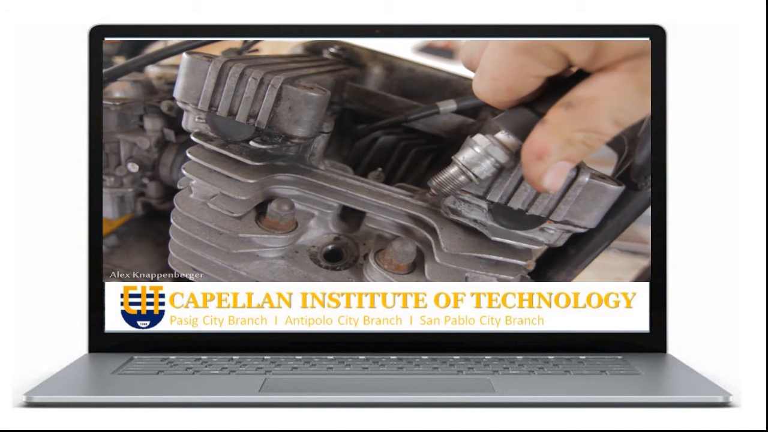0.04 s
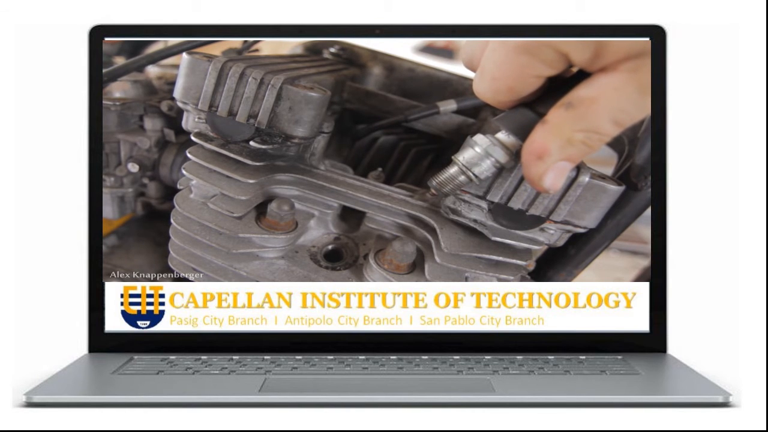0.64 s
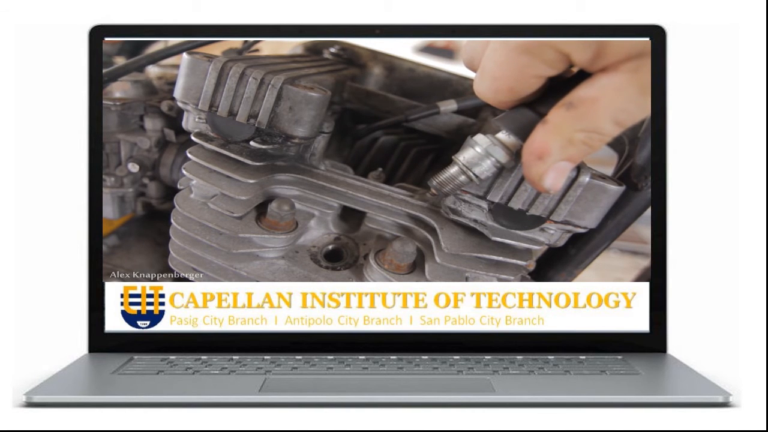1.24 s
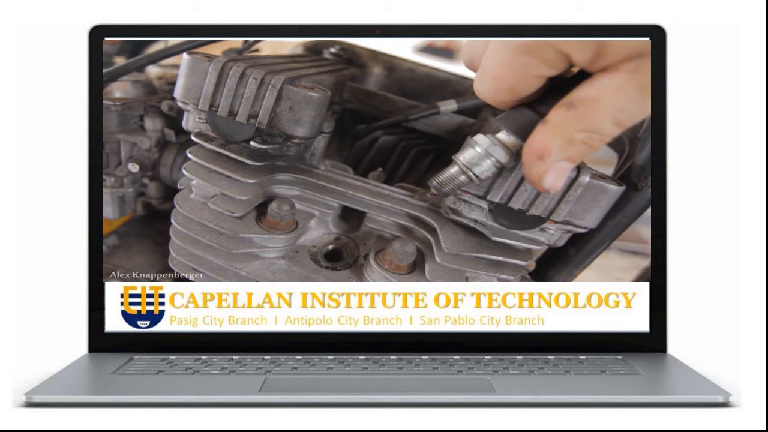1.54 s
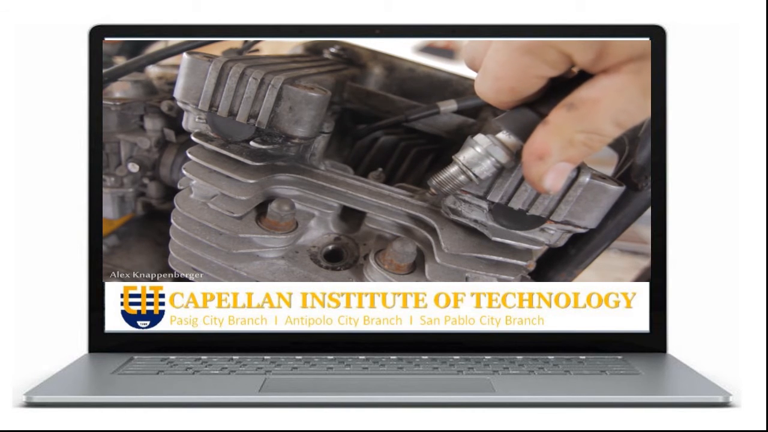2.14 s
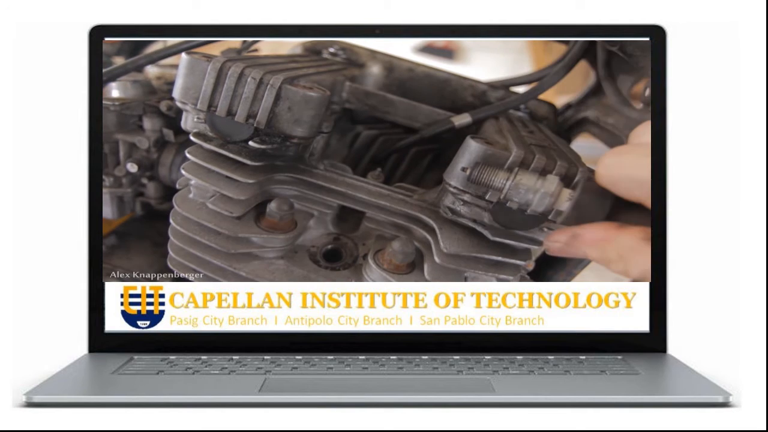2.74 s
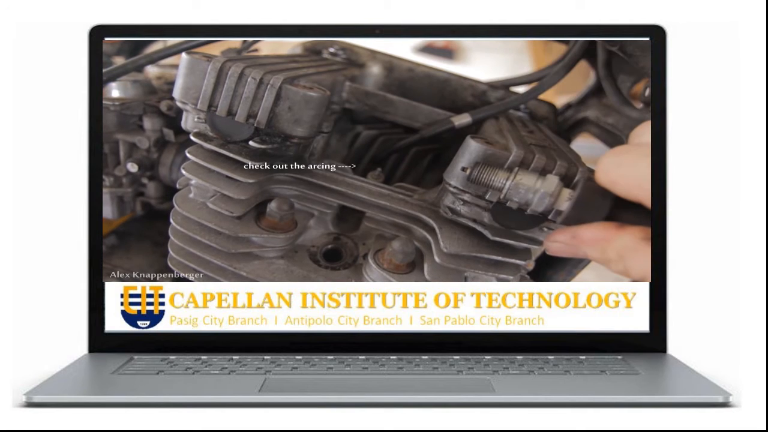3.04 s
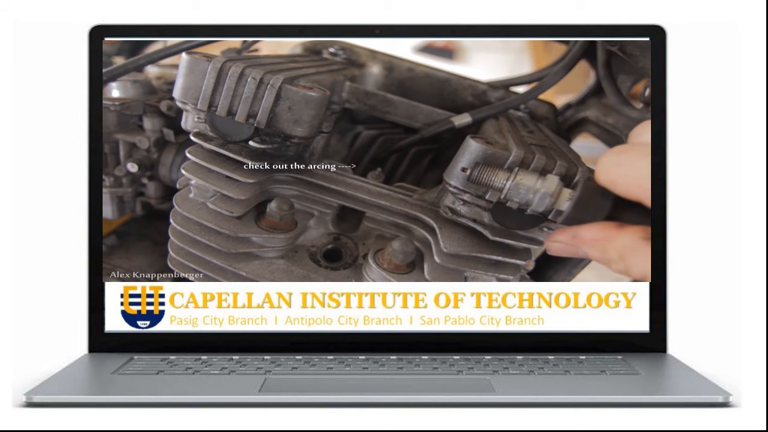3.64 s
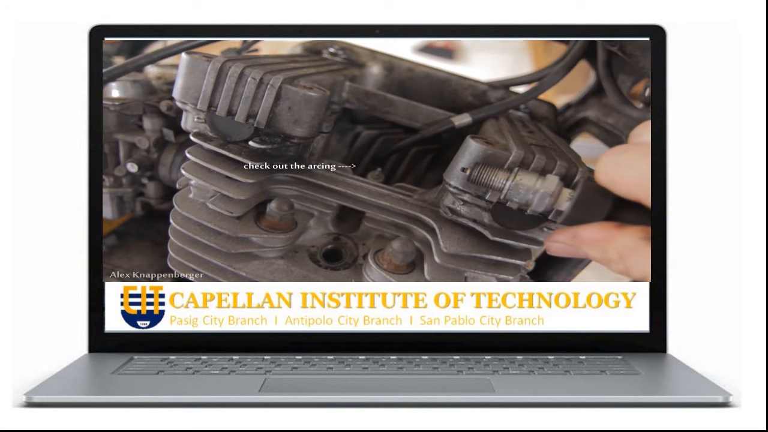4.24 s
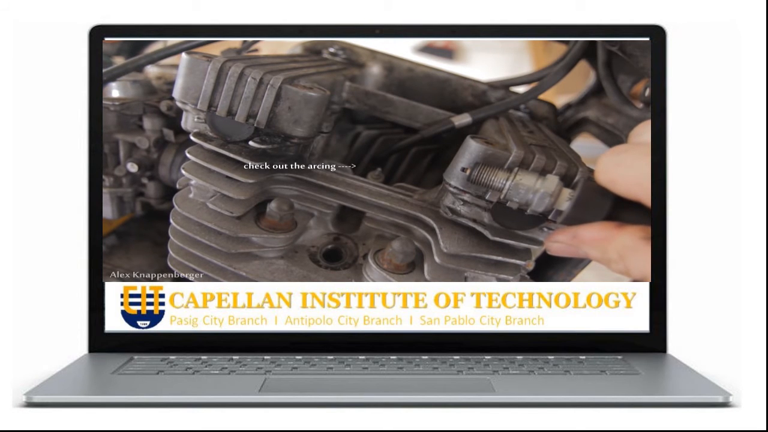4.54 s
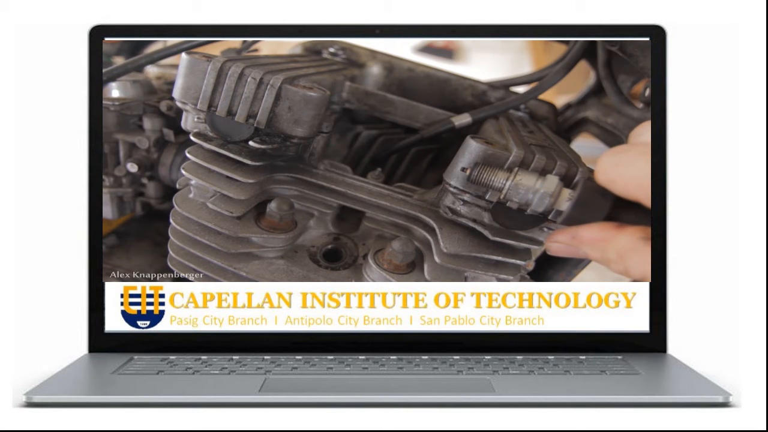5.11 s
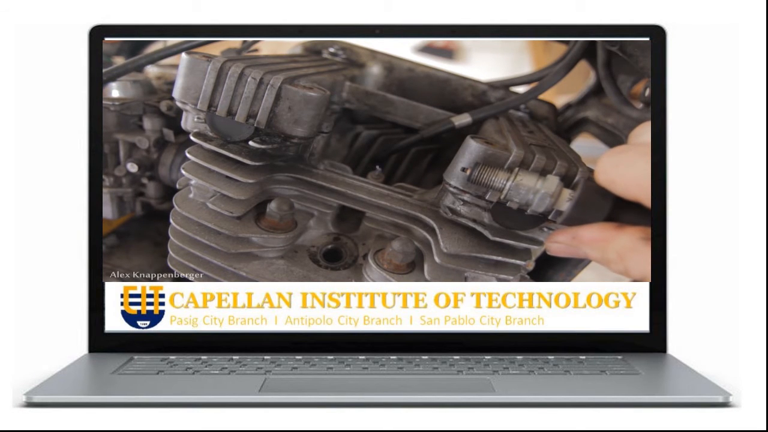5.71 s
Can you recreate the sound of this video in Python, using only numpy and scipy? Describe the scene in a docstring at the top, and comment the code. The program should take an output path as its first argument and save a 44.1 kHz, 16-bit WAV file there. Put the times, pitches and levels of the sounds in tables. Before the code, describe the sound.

A motorcycle engine turns over in two rattling, whining tries on its starter, never catching, with a short pause between them.

```python
"""Over the low hum of a workshop, an electric starter turns a motorcycle engine with one spark plug out.
Nothing fires. Each cycle loads the starter four times: three short strokes ending in a puff, then a long
one. Under each the drive rattles and the motor slows, so its whine sags and its brush hiss dips.
At 2.3 s the starter is released and runs down with a clunk; in the pause a hand shifts the plug lead.
At 3.2 s the starter engages with a crack and turns the engine again."""
import sys
import numpy as np
from scipy import signal
from scipy.fft import rfft, irfft
from scipy.io import wavfile

SR = 44100
rng = np.random.default_rng(int(sys.argv[2]) if len(sys.argv) > 2 else 0)


def put_to_file(sound):
    """Save the sound as 16-bit audio at rate SR, in the file named by the first command-line argument."""
    columns = np.atleast_2d(sound).T  # one column per channel
    safe = np.clip(columns, -1, 1)
    whole_steps = np.round(safe * 32767)
    wavfile.write(sys.argv[1], SR, whole_steps.astype(np.int16))


N = 258867
T = np.arange(N) / SR
STOP_S, RESTART_S = 2.315, 3.24  # starter button released, pressed again
FREE_MESH_HZ, LAG_S = 722, .024  # unloaded gear mesh; delay from a stroke's end to the lowest speed

# steady partials of the hum: pitch_hz, rms_db
HUM_PARTIALS = [(91.5, -47), (127, -55), (177.6, -55), (285.3, -60), (419.9, -54.5), (506, -60),
                (656.8, -62)]
# spectrum of the workshop air: frequency_hz, gain_db
ROOM_SPECTRUM = [(10, 2.5), (30, -4.5), (55, -8), (90, -14.5), (130, -14.5), (220, -20.5), (450, -22.5),
                 (800, -23.5), (1500, -30.5), (2500, -40.5), (4200, -51), (5500, -54.5), (15000, -59)]
# engine cycles, timed by the starts of their strokes: first_s, second_s, last_s, strength_db
ENGINE_CYCLES = [(-.108, .034, .208, .5), (.388, .532, .706, 0), (.889, 1.032, 1.207, -.7),
                 (1.39, 1.535, 1.668, -.3), (1.842, 1.983, 2.157, .8), (3.252, 3.39, 3.58, -.3),
                 (3.765, 3.903, 4.082, 0), (4.264, 4.406, 4.583, 0), (4.764, 4.906, 5.076, 0),
                 (5.263, 5.402, 5.572, 0), (5.76, 5.9, 6.07, 0)]
# the four strokes of a cycle: length_s, rise_s, start_load_db, end_load_db, whine_db, slowest_mesh_hz
STROKE_SHAPES = [(.062, 0.0073, -15.5, -18.5, -33, 495), (.056, 0.0068, -14.5, -22.5, -29.5, 500),
                 (.027, 0.018, -18.5, -17, -31.5, 630), (.118, 0.011, -21.5, -17, -25.5, 485)]
# clutch snap at the start of each of the four, gear knock near its end: snap_db, knock_db
STROKE_IMPACTS = [(-19.5, -14), (-21, -14), (-24, -27), (-21.5, -15.5)]
# envelope of the unloaded gear and chain clatter: time_s, level_db
CLATTER_ENVELOPE = [(0, -28), (2.29, -28), (2.35, -27.5), (2.42, -36.5), (2.5, -36.5), (2.58, -46.5),
                    (2.75, -62), (3.236, -82), (3.241, -27), (5.87, -29)]
# spectra of the drive under load and running free: frequency_hz, gain_db
LOADED_SPECTRUM = [(60, -11.5), (200, -22.5), (450, -21.5), (750, -11.5), (1000, -5.5), (1450, -2.5),
                   (2100, -3), (2800, 0.5), (3600, -7), (4400, -14.5), (5200, -13.5), (9000, -27.5),
                   (15000, -45)]
FREE_SPECTRUM = [(30, -13), (120, -17.5), (300, -2.5), (450, -7.5), (700, -8), (1100, -1), (1600, -4),
                 (2400, -2), (4000, -6.5), (5200, -12), (9000, -13), (15000, -27)]
# resonances of the engine cases and fins: centre_hz, width_hz, lift_db
CASE_MODES = [(533, 86, 7), (802, 33, 5), (953, 103, 4.5), (1112, 76, 7.5), (1271, 8.3, 2.5),
              (1355, 165, 6.5), (1538, 85, 6.5), (1616, 66, 7), (1925, 56, 5.5), (2020, 27, 3.5),
              (2175, 30, 4), (2578, 62, 8), (2615, 160, -3), (2987, 64, 4), (3040, 70, -7), (3384, 28, 3.5),
              (3456, 54, 0.5), (4075, 100, 6.5), (4353, 174, 7), (6130, 230, 4), (6970, 260, 6),
              (8520, 270, 6), (9370, 240, 4.5), (10400, 270, 5), (11070, 110, 7)]
# harmonics of the gear mesh: multiple, level_db
MESH_HARMONICS = [(1, -10), (2, -5), (3, -16), (4, 0), (5, -6), (6, -13), (7, -14)]
# how well the gear cover radiates the whine: frequency_hz, gain_db
COVER_RESPONSE = [(450, 0), (550, -1), (610, -12), (780, -12), (950, -2), (1250, -2), (2600, 1), (6000, 0)]
# spectra of the brush hiss, the steel snaps and the exhaust air: frequency_hz, gain_db
BRUSH_SPECTRUM = [(500, -39), (2000, 0.5), (3800, 1), (5200, -5.5), (7500, -0.5), (9500, -1.5),
                  (11000, -2.5), (12500, -3.5), (15500, -4)]
SNAP_SPECTRUM = [(300, -31), (1200, -5), (4000, -4.5), (5600, 2), (7500, 0.5), (10000, -4.5), (15500, 0.5)]
RUSH_SPECTRUM = [(15, 3.5), (35, 9.5), (55, -8), (90, -5.5), (130, -1.5), (170, -8.5), (260, -9),
                 (400, -14.5), (900, -59), (4000, -71)]
# puffs of the first three strokes, timed from each stroke's start: delay_s, level_db, rush_decay_s
EXHAUST_PUFFS = [(.041, -26, .028), (0.025, -26, 0.027), (.046, -23.5, 0.031)]
# resonances of the exhaust pipes: nominal_hz, level_db, t60_s
PIPE_MODES = [(27.7, -11, 0.19), (85, -1, 0.17), (159.5, -3.5, 0.092), (257, -8.5, 0.1)]
# jerks as the starter lets go and as it gets the engine moving: start_s, length_s, load_db
DRIVE_JERKS = [(2.361, .016, -19.5), (3.35, .028, -15.5), (3.4, .04, -15)]
# clunks as slack in the drive is taken up: start_s, pitch_hz, level_db, t60_s
SLACK_CLUNKS = [(2.369, 286.5, -31, 0.074), (3.255, 360, -26.5, 0.1), (3.81, 470, -29, 0.34)]
# ticks as the engine comes to rest, then the crack of the starter engaging: start_s, level_db
STOP_START_SNAPS = [(2.496, -45), (2.6254, -47), (3.238, -8.5), (3.2419, -20)]
# rubs of the hand on the plug lead: start_s, length_s, pitch_hz, spread_hz, level_db
LEAD_RUBS = [(2.575, 0.15, 4200, 400, -58), (2.668, 0.08, 3300, 130, -56), (2.725, .11, 3940, 220, -61),
             (2.787, .1, 3100, 280, -61), (3.17, 0.098, 4740, 900, -56)]


def amp(db):
    """Amplitude ratio of a level in decibels."""
    return 10 ** (np.asarray(db) / 20)


def unit_rms(x):
    """Normalisation to unit power."""
    return x / np.sqrt(np.mean(x ** 2) + 1e-20)


def add(mix, start_s, sound):
    """Superposition: a sound sums into the mix from its start time."""
    at = round(start_s * SR)
    part, sound = mix[max(at, 0):], sound[max(-at, 0):]
    part[:len(sound)] += sound[:len(part)]


def drift(cutoff_hz):
    """Low-pass noise: a random fluctuation of unit power."""
    rolloff = 1 + (np.fft.rfftfreq(N, 1 / SR) / cutoff_hz) ** 4
    return unit_rms(irfft(rfft(rng.standard_normal(N)) / rolloff, N))


def colour(x, spectrum, modes=(), size=8192):
    """Source and filter: a minimum-phase response of unit energy, with resonances on a smooth spectrum."""
    hz = abs(np.fft.fftfreq(size, 1 / SR))
    knots_hz, knots_db = np.transpose(spectrum)
    db = np.interp(np.log(hz + 1), np.log(knots_hz), knots_db)
    db += sum(lift / (1 + (2 * (hz - centre) / width) ** 2) for centre, width, lift in modes)
    response = np.exp(np.conj(signal.hilbert(np.log(amp(db)))))
    ring = np.fft.ifft(response).real[:size // 2]
    return signal.oaconvolve(x, ring / np.linalg.norm(ring))[:N]


def workshop():
    """Tones over broadband noise: a gently wavering hum above rumbling air."""
    hum = sum(amp(db + drift(4)) * np.sqrt(2) * np.sin(2 * np.pi * hz * T + .3 * drift(4))
              for hz, db in HUM_PARTIALS)
    return hum + amp(-37) * colour(rng.standard_normal(N), ROOM_SPECTRUM)


def stroke_starts(first, second, last, lead_s=.067):
    """Cyclic loading: the times at which the four pistons begin to resist the starter."""
    return [first, second, last - lead_s, last]


def strokes(rest_s=.038):
    """Intermittent loading: yields start_s, length_s, strength_db, place; hurried strokes are cut short."""
    for *times, db in ENGINE_CYCLES:
        starts = stroke_starts(*times)
        for place, (start, gap) in enumerate(zip(starts, np.diff(starts + [np.inf]))):
            yield start, min(STROKE_SHAPES[place][0], max(gap - rest_s, LAG_S)), db, place


def held(start, length, rise_s=.0073, release_s=.024):
    """Envelope of a load: linear rise, hold, exponential release."""
    return np.clip((T - start) / rise_s, 0, 1) * np.exp(-np.clip((T - start - length) / release_s, 0, 20))


def starter_mesh_hz(recover_s=.05, run_down_s=.078, spin_up_s=.025):
    """Load and inertia: the motor slows under each stroke, coasts down when released, then spins up."""
    sag_hz = np.zeros(N)
    for start, length, _, place in strokes():
        slowest = start + length + LAG_S
        dip = np.interp(T, [start, slowest, slowest + recover_s], [0, 1, 0]) ** 1.15
        sag_hz = np.maximum(sag_hz, dip * (FREE_MESH_HZ - STROKE_SHAPES[place][-1]))
    run_down = np.exp(-np.maximum(T - STOP_S, 0) / run_down_s)
    spin_up = 1 - np.exp(-abs(T - RESTART_S) / spin_up_s)
    waver = 1 + .005 * drift(150) + .005 * drift(8)
    return (FREE_MESH_HZ - sag_hz) * np.where(T > RESTART_S, spin_up, run_down) * waver


def piston_load(idle_whine_db=-41, take_up_s=.013, chatter_db=.5):
    """Reaction force: the pistons set the chattering load in the drive and how strongly its teeth sing."""
    force, singing = np.zeros(N), np.full(N, amp(idle_whine_db))
    for start, length, db, place in strokes():
        _, rise_s, start_db, end_db, whine_db, _ = STROKE_SHAPES[place]
        grip = amp(db) * held(start, length, rise_s)
        force = np.maximum(force, grip * np.interp(T, [start, start + length], amp([start_db, end_db])))
        singing += grip * amp(whine_db)
    for start, length, db in DRIVE_JERKS:
        force = np.maximum(force, amp(db) * held(start, length))
    take_up = 1 - np.exp(-abs(T - RESTART_S) / take_up_s)
    return force * take_up * amp(chatter_db * drift(56)), singing


def contacts(per_s, spread_db, sliding_db):
    """Shot noise: tiny metal contacts at random times, over smooth sliding noise."""
    sizes = amp(spread_db * np.minimum(rng.exponential(1, N), 3)) * rng.choice([-1, 1], N)
    clicks = unit_rms(sizes * (rng.random(N) < per_s / SR))
    return unit_rms(clicks + amp(sliding_db) * rng.standard_normal(N))


def drive_rattle(force, turning, mesh_cycles, knock_lead_s=.01, knock_decay_s=.0072):
    """Impact excitation: chains and gears ring the cases, hard under load and lightly when free."""
    tooth_pulse = unit_rms(1 + .36 * np.cos(2 * np.pi * mesh_cycles))
    loaded = amp(-1.5) * force * tooth_pulse * contacts(per_s=1100, spread_db=0, sliding_db=-.5)
    t = T[:SR // 20]
    for start, length, db, place in strokes():
        size = amp(db + STROKE_IMPACTS[place][1] + 1.5 * rng.standard_normal())
        knock = size * np.exp(-t / knock_decay_s) * rng.standard_normal(len(t))
        add(loaded, start + length - knock_lead_s, knock)
    free = amp(-3) * turning * contacts(per_s=1200, spread_db=3.5, sliding_db=2.5)
    return colour(loaded, LOADED_SPECTRUM, CASE_MODES) + colour(free, FREE_SPECTRUM, CASE_MODES)


def gear_whine(level, mesh_cycles, rough_db=2.5):
    """Forced vibration: mesh harmonics, roughened by uneven teeth, glide through the case resonances."""
    tone = sum(amp(db + rough_db * drift(60)) * np.cos(2 * np.pi * (k * mesh_cycles + rng.random()))
               for k, db in MESH_HARMONICS)
    return colour(unit_rms(tone) * level, COVER_RESPONSE, CASE_MODES)


def brush_hiss(level, mesh_cycles, teeth=8, flutter_db=1.0):
    """Sliding contact: brushes hiss and crackle on the commutator, throbbing once a motor turn."""
    throb = unit_rms(1 + .15 * np.cos(2 * np.pi * mesh_cycles / teeth))
    flutter = amp(flutter_db * drift(31))
    crackle = contacts(per_s=2500, spread_db=5.5, sliding_db=7)
    return colour(level * throb * flutter * crackle, BRUSH_SPECTRUM, CASE_MODES)


def steel_snaps(bite_s=.003, decay_s=.0048):
    """Brief impacts have broad spectra: steel catches steel at each stroke, at rest and on restarting."""
    bursts, t = np.zeros(N), T[:SR // 25]
    clutch = [(start + bite_s, db + STROKE_IMPACTS[place][0]) for start, _, db, place in strokes()]
    for start, db in clutch + list(STOP_START_SNAPS):
        add(bursts, start, amp(db) * np.exp(-t / decay_s) * rng.standard_normal(len(t)))
    return colour(bursts, SNAP_SPECTRUM, CASE_MODES)


def exhaust(turning, rise_s=.0057, push_s=.025, build_up_s=.083):
    """Air-column resonance: each puff pushes air out, rings the pipes and trails a rush."""
    ring, rush, t = np.zeros(N), np.zeros(N), T[:SR // 4]
    shove = amp(-4) * t / push_s * (1 - t / push_s / 2) * np.exp(-t / push_s)
    for *times, _ in ENGINE_CYCLES:
        for start, (delay, db, decay_s) in zip(stroke_starts(*times), EXHAUST_PUFFS):
            size = amp(db) * (1 - np.exp(-abs(start - RESTART_S) / build_up_s))  # pressure builds from rest
            pipes = sum(amp(level - 60 * t / t60) * np.sin(2 * np.pi * hz * rng.uniform(.894, 1.074) * t)
                        for hz, level, t60 in PIPE_MODES)
            add(ring, start + delay, size * (pipes + shove))
            add(rush, start + delay, size * amp(-2) * (1 - np.exp(-t / rise_s)) * np.exp(-t / decay_s))
    return ring + colour((rush + amp(-24) * turning) * rng.standard_normal(N), RUSH_SPECTRUM)


def reflections(x, t60_s=.25, wet_db=-12, cutoff_hz=6000, per_s=2000):
    """Reverberation: scattered, slightly dull echoes from the frame and the workshop walls."""
    t = T[:SR // 2]
    taps = rng.choice([-1, 1], len(t)) * (rng.random(len(t)) < per_s / SR)
    taps = taps * (t > .003) * amp(-60 * t / t60_s)
    pole = np.exp(-2 * np.pi * cutoff_hz / SR)
    dulled = signal.lfilter([1 - pole], [1, -pole], x)
    return amp(wet_db) * signal.oaconvolve(dulled, taps / np.linalg.norm(taps))[:N]


def crankcase_clunks(rise_s=.0019):
    """Damped free vibration: the crankcase booms briefly as slack is taken up."""
    out, t = np.zeros(N), T[:SR // 4]
    for start, hz, db, t60 in SLACK_CLUNKS:
        add(out, start, amp(db - 60 * t / t60) * (1 - np.exp(-t / rise_s)) * np.sin(2 * np.pi * hz * t))
    return out


def hand_on_lead(fall_per_s=1.1, bump_s=2.845, bump_db=-29, bump_hz=33):
    """Friction: faint narrow-band squeaks slide down in pitch, with one soft low bump among them."""
    out = np.zeros(N)
    for start, length, hz, spread_hz, db in LEAD_RUBS:
        t = np.arange(0, length, 1 / SR)
        cycles = np.cumsum(hz * (1 - fall_per_s * (t - length / 2))) / SR
        squeak = np.sqrt(2) * drift(spread_hz)[:len(t)] * np.cos(2 * np.pi * cycles)
        add(out, start, amp(db) * squeak * np.sin(np.pi * t / length))
    t = T[:SR // 10]
    add(out, bump_s, amp(bump_db) * np.hanning(len(t)) * np.sin(2 * np.pi * bump_hz * t))
    return out


def scene():
    """Superposition of all sources, alike in both channels; whine and hiss follow power laws of speed."""
    mesh_hz = starter_mesh_hz()
    mesh_cycles, pace = np.cumsum(mesh_hz) / SR, mesh_hz / FREE_MESH_HZ
    force, singing = piston_load()
    turning = amp(np.interp(T, *np.transpose(CLATTER_ENVELOPE)))
    metal = drive_rattle(force, turning, mesh_cycles) + gear_whine(singing * pace ** 1.84, mesh_cycles)
    metal += steel_snaps() + crankcase_clunks()
    hiss_level = amp(-26.5) * pace ** 1.8 + amp(-21) * force + amp(-29) * turning
    mono = metal + reflections(metal) + brush_hiss(hiss_level, mesh_cycles)
    mono += exhaust(turning) + hand_on_lead() + workshop()
    return np.array([mono, mono])


def record(dry, ceiling=.75, cutoff_hz=15500):
    """Soft saturation rounds the tallest peaks; a low-pass filter then limits the band."""
    rounded = dry / (1 + (dry / ceiling) ** 4) ** (1 / 4)
    low_pass = signal.firwin(801, cutoff_hz, window=("kaiser", 8), fs=SR)
    return signal.oaconvolve(rounded, low_pass[None], "same")


dry = scene()
out = record(dry)
put_to_file(out)
```